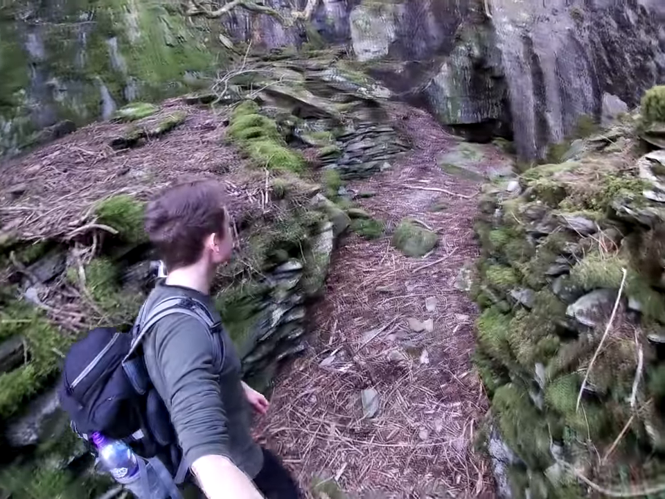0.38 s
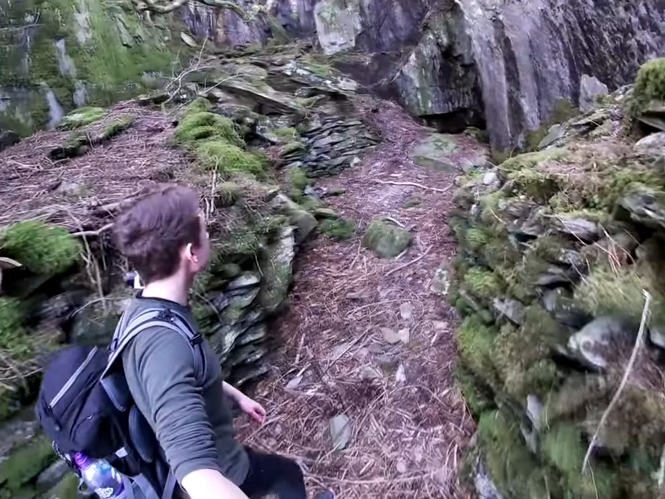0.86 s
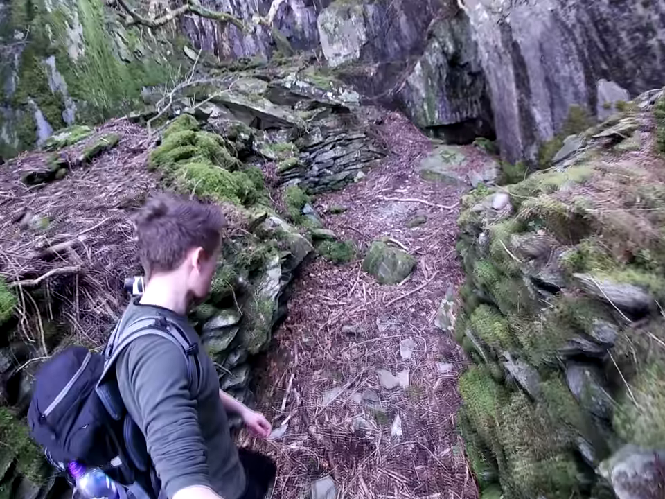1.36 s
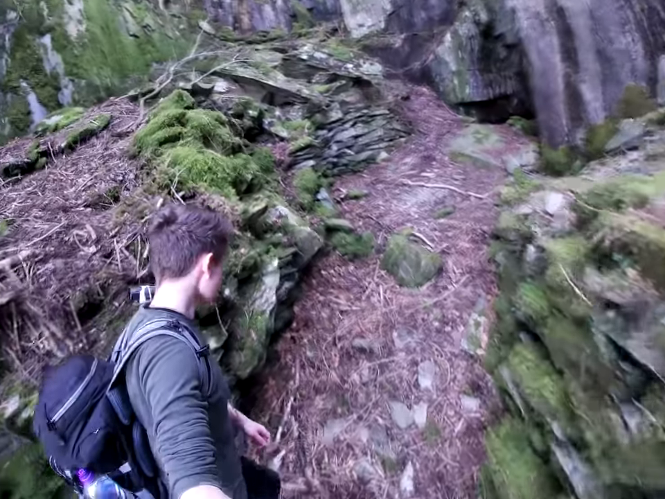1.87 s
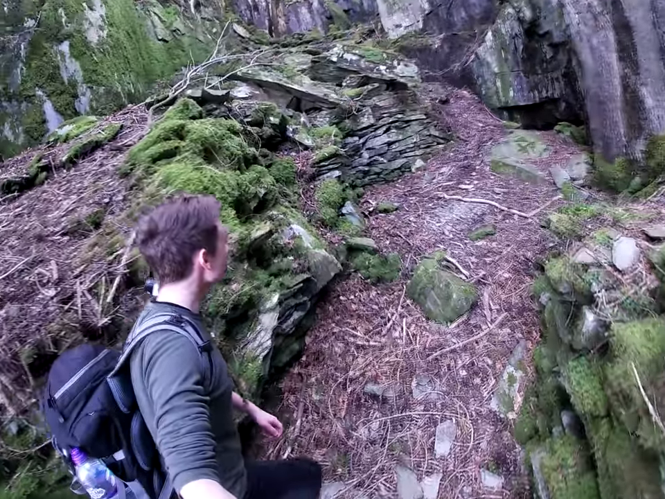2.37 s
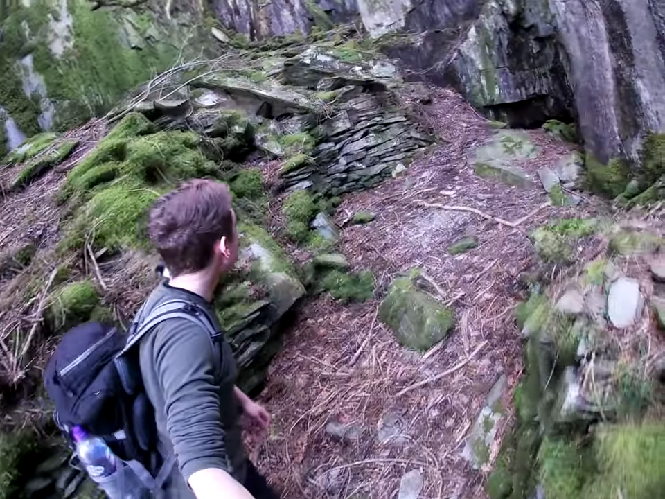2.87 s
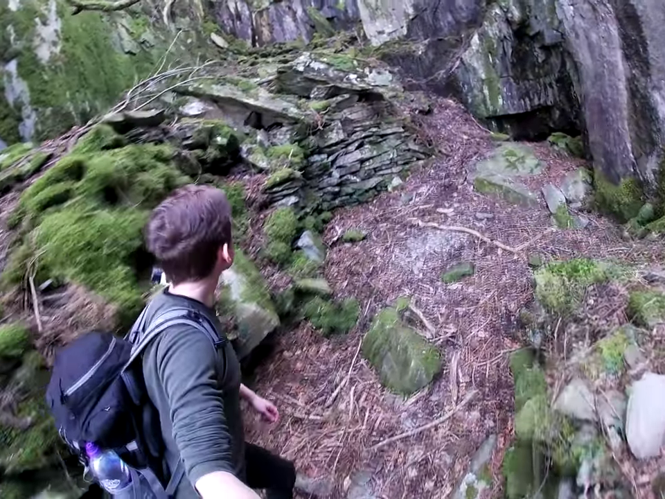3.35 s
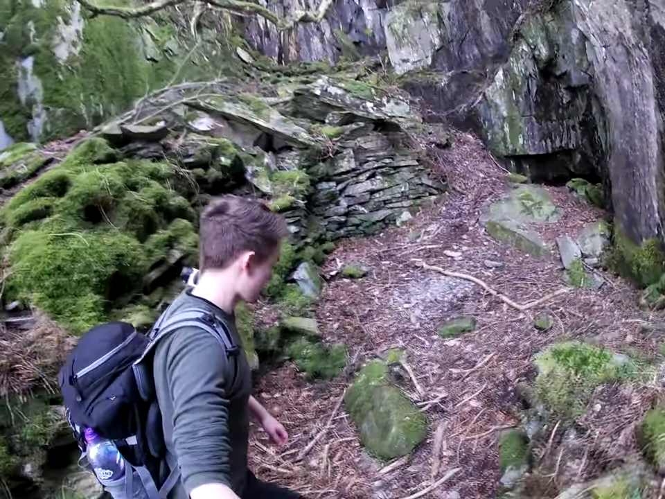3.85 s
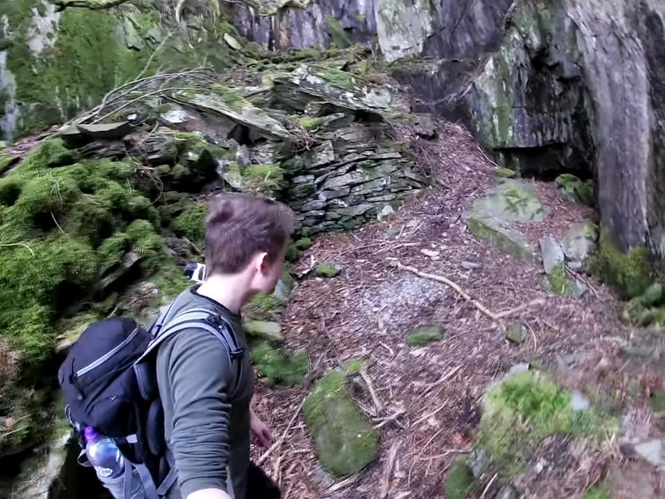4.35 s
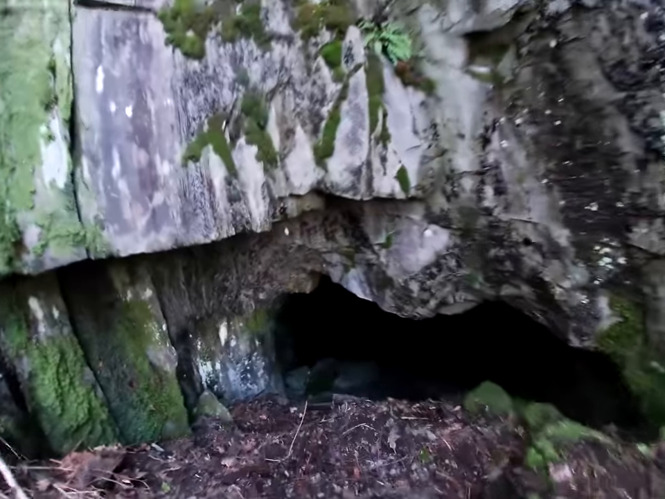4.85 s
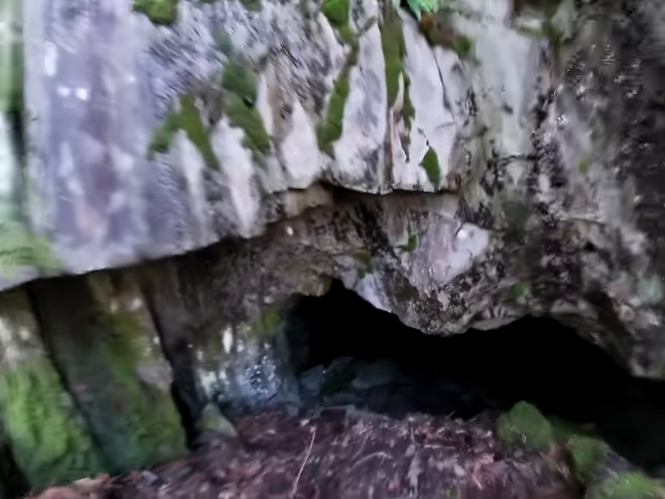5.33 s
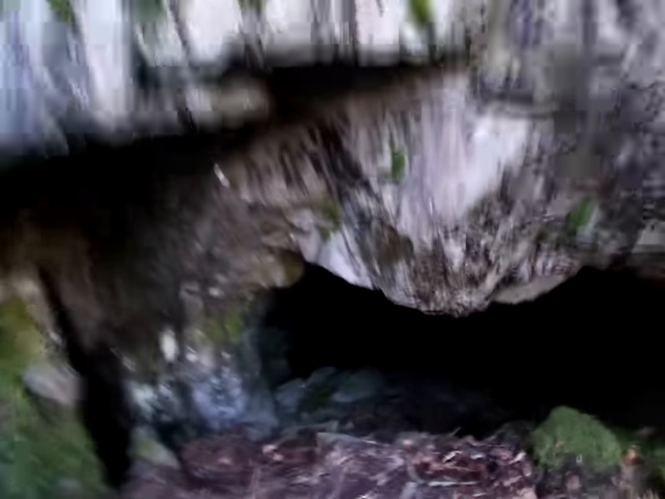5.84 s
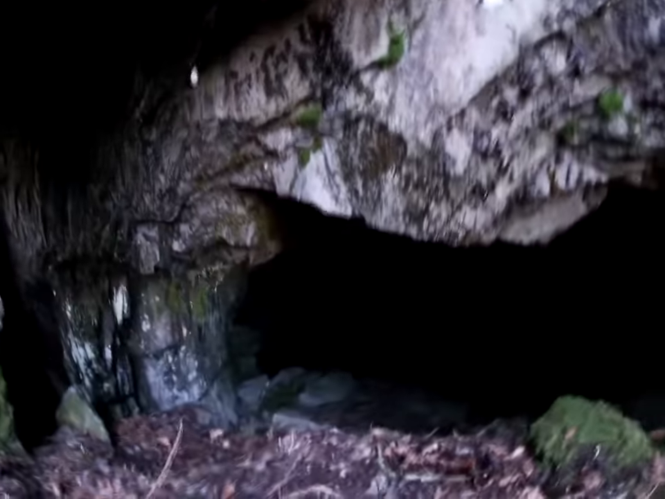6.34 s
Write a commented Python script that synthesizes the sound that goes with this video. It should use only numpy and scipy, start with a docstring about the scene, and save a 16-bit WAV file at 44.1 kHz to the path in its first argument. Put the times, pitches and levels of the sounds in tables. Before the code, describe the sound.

Close, crackly footsteps on woodland litter, sharp twig cracks, small stone clacks, a short scraping slab and low air rumble outdoors.

```python
"""Boots on litter and slate

Boots walk over dry needles, twigs and loose slate between rock walls, heard by one small microphone on a pole.
Litter is clouds of tiny damped breaks over dense noise; twigs are cracks with knocks and splinters; a dragged slate
is noise through resonances. A sole squeals by stick and slip, slate chips and a pack tap as decaying modes,
heel falls swing the pole as low damped sines, and light air rumbles as shaped noise."""
import sys
import numpy as np
from scipy import signal
from scipy.fft import rfft, irfft, next_fast_len
from scipy.io import wavfile
from scipy.ndimage import uniform_filter1d, map_coordinates

SR = 44100
rng = np.random.default_rng(int(sys.argv[2]) if len(sys.argv) > 2 else 0)


def wav_record(signal):
    """Record a signal, one row per channel, as 16-bit PCM in the file named by sys.argv[1]."""
    frames = np.transpose(np.atleast_2d(signal))
    bounded = np.clip(frames, -1, 1)
    # unit amplitude maps onto the largest positive 16-bit level
    quanta = np.round(bounded * 32767).astype(np.int16)
    wavfile.write(sys.argv[1], SR, quanta)


def field_ratio(decibels):
    """Amplitude ratio for a level in dB (20 dB per decade); scalars and array-likes work."""
    return 10 ** (np.asarray(decibels, dtype=float) / 20)


N = 295856
T = np.arange(N) / SR


def unit(x):
    """Normalisation: the signal scaled to rms 1."""
    return x / np.sqrt(np.mean(x ** 2) + 1e-20)


def along(points, hz):
    """Interpolation of (f/Hz, value) points on a logarithmic frequency axis."""
    f, v = np.transpose(points)
    return np.interp(np.log(hz + 1), np.log(f + 1), v)


def curves(rows, outside=None):
    """Linear interpolation in time: one value per sample for each column after t/s."""
    s, *cols = np.transpose(rows)
    return [np.interp(T, s, c, outside, outside) for c in cols]


def wobble(rate):
    """Slow random modulation: a smooth curve through rate random knots a second."""
    knots = rng.standard_normal(int(N * rate / SR) + 4)
    return map_coordinates(knots, [T * rate])


def filtered(x, response):
    """Linear filtering: the spectrum times a complex response of frequency."""
    m = next_fast_len(N + SR // 2)
    return irfft(rfft(x, m) * response(np.fft.rfftfreq(m, 1 / SR)), m)[..., :N]


def coloured(x, spectrum):
    """Spectral shaping by (f/Hz, gain/dB) points, then scaling to rms 1."""
    return unit(filtered(x, lambda hz: field_ratio(along(spectrum, hz))))


def air():
    """Turbulence: moving air is a lumpy low rumble of shaped noise, over a steady broadband hush."""
    # air over the microphone: t/s, rumble level/dB
    gusts = [(0, -63), (.35, -58), (1.5, -73.5), (1.9, -58.5), (3.4, -67), (4.2, -66), (5.3, -70),
             (5.75, -56), (6.25, -52), (6.6, -60)]
    # colour of the rumble: f/Hz, relative gain/dB
    rumble_colour = [(18, 2.5), (40, 4), (70, -12.5), (130, -56.5)]
    # colour of the steady hush, its top closed at 13 kHz: f/Hz, relative gain/dB
    hush_colour = [(53, -39.5), (90, -4.5), (175, 5), (354, -11.5), (778, -5), (2490, -9.5), (6070, -10),
                   (8630, -15), (12800, -40), (13800, -90)]
    hush_db = -64.5
    lumps = field_ratio(curves(gusts)[0] + 1.7 * wobble(25.0))
    rumble = lumps * coloured(rng.standard_normal(N), rumble_colour)
    return rumble + field_ratio(hush_db) * coloured(rng.standard_normal(N), hush_colour)


def rocks(x):
    """Reverberation: diffuse reflections from rock walls, each frequency decaying at its own rate."""
    # decay of the rock walls' answer: f/Hz, t60/s
    wall_decay = [(300, 0.17), (6000, 0.12)]
    hz, t, z = signal.stft(rng.standard_normal(SR // 3), SR, nperseg=256)
    decay = field_ratio(-60 * t / along(wall_decay, hz)[:, None])
    tail = signal.istft(z * decay, SR, nperseg=256)[1]
    delayed = np.pad(x, (150, 0))  # samples
    return signal.fftconvolve(delayed, tail / np.linalg.norm(tail))[:N]


def thuds():
    """Damped oscillation: the pole swings on after each heel fall, over a dull rattle of settling ground."""
    # heel falls felt through the pole: t/s, level/dB before the soft onset, f/Hz, t60/s
    heel_falls = [(1.125, -36, 206, 0.06), (2.152, -36, 212, 0.033), (2.392, -35.5, 74, 0.12),
                  (3.329, -41.5, 62, 0.4), (3.5, -37.5, 64.4, 0.24), (3.47, -33.5, 198, 0.15),
                  (4.087, -26.5, 51.3, 0.2), (4.763, -28.5, 198, 0.048), (5.33, -34, 320, 0.072),
                  (5.63, -41.5, 84.4, 0.17), (5.842, -32, 84.5, 0.1), (5.92, -17, 282, 0.017),
                  (5.966, -29.5, 72.6, 0.14), (6.564, -44, 70.4, 0.12)]
    out, t = np.zeros(N + SR), np.arange(SR // 2) / SR
    for s, db, hz, t60 in heel_falls:
        dull = np.convolve(rng.standard_normal(len(t)), np.hanning(SR // 500), "same")
        ground = dull * field_ratio(-31.5 - 60 * t / 0.18)
        swing = -np.sin(2 * np.pi * hz * t) * field_ratio(-60 * t / t60)
        onset = 1 - np.exp(-t * hz / 0.55)  # slower swings start softer
        out[round(s * SR):][:len(t)] += field_ratio(db) * (swing + ground) * onset
    return out[:N]


def slate():
    """Forced resonance: grit under the sliding slab kicks its modes; the hollow below sings as a fuzzy rising tone."""
    # a slate dragged over stones: t/s, level/dB
    scrape = [(5.39, -53), (5.41, -38.5), (5.53, -50.5), (5.7, -46), (5.74, -71)]
    # resonances of the slab: f/Hz, width/Hz, gain/dB
    modes = [(364, 39, 0), (687, 46, 3.5), (1140, 20, -4), (1350, 67, -4.5), (2176, 57, -7), (3460, 88, -3)]
    # the hollow under the slate sings: t/s, level/dB
    hollow = [(5.22, -67), (5.31, -51.5), (5.37, -75.5), (5.46, -57), (5.6, -54.5), (5.85, -66.5)]
    hollow_hz, closes_hz_per_s = 279, 190  # it rings higher as it closes

    def body(f):
        """Modal sum: resonances of alternating sign on a small direct part, with a gentle treble loss."""
        total = 0.096
        for k, (centre, width, db) in enumerate(modes):
            total = total + (-1) ** k * field_ratio(db) * 1j * f * width / (centre ** 2 - f ** 2 + 1j * f * width)
        return total / (1 + (f / 2500) ** 2)

    grit = rng.standard_normal(N) * field_ratio(2.5 * wobble(45) + 3 * wobble(200))
    phase = 2 * np.pi * np.cumsum(hollow_hz + closes_hz_per_s * (T - hollow[0][0])) / SR
    hum = np.sin(phase) * wobble(110) + np.cos(phase) * wobble(110)  # random sidebands blur the tone
    dragged = field_ratio(curves(scrape, -120)[0]) * unit(filtered(grit, body))
    return dragged + field_ratio(curves(hollow, -120)[0]) * hum


def ring(s, db, hz, t60):
    """Modal decay: a sum of sines, each with a short attack and an exponential decay."""
    since = np.maximum(T - s, 0)
    attack = 1 - np.exp(-since / 0.00079)  # s
    return np.sum(field_ratio(db - 60 * since / t60) * np.sin(2 * np.pi * hz * T) * attack, 0)


def taps():
    """Impact modes: one thin long mode on the pack; stones ring shorter and unevenly, the larger with an upper mode."""
    # something small on the pack taps: t/s, level/dB before the attack
    tinks = [(3.757, -51.5), (3.785, -50), (3.834, -54)]
    # slate chips knock together: t/s, level/dB before attack and chatter, f/Hz
    clacks = [(.840, -45, 761), (.850, -44, 764), (.862, -37.5, 753), (1.674, -35, 5970), (1.809, -37, 730),
              (2.64, -33.5, 717), (2.655, -28, 910), (2.717, -33, 5700), (2.724, -30, 8330),
              (4.045, -34, 850), (4.145, -41, 1002), (5.911, -40, 498), (6.544, -39, 1198),
              (6.561, -39.5, 1200)]
    tink_hz, tink_t60_s, clack_t60_s = 1900, 0.05, 0.035
    overtone_ratio, overtone_db, chatter_db = 3.1, -10, 2.5
    s, db, hz = np.transpose(clacks)[..., None]
    upper_db = db + overtone_db - 120 * (hz > 2000)  # small, high chips have no audible upper mode
    chips = ring(s, db, hz, clack_t60_s) + ring(s, upper_db, hz * overtone_ratio, clack_t60_s / 2)
    pack = ring(*np.transpose(tinks)[..., None], tink_hz, tink_t60_s)
    uneven = field_ratio(chatter_db * wobble(300)) * (1 + 0.4 * wobble(1600))  # uneven contact
    return pack + chips * uneven


def squeal():
    """Stick and slip: a shaky rate that speeds up gives a rough gliding tone with a weak overtone."""
    # a sole slips on stone: t/s, level/dB before the envelope
    slips = [(3.4593, -19), (3.47, -15.5), (3.496, -27)]
    attack_s, t60_s = 0.00075, 0.046
    from_hz, to_hz, glide_s = 880, 1205, 0.00604
    hz = to_hz - (to_hz - from_hz) * np.exp(-np.maximum(T - slips[0][0], 0) / glide_s)
    size = 0
    for s, db in slips:
        since = np.maximum(T - s, 0)
        size = size + field_ratio(db - 60 * since / t60_s) * (1 - np.exp(-since / attack_s))
    phase = 2 * np.pi * np.cumsum(hz * (1 + 0.0643 * wobble(250))) / SR
    return size * field_ratio(2.5 * wobble(120)) * (np.sin(phase) + 0.15 * np.sin(2 * phase))


def twigs():
    """Brittle fracture: a sharp crack, a short woody knock, and splinters that rattle on in the wood's pitch range."""
    # breaking twigs: t/s, level/dB of the whole break, knock f/Hz, knock level/dB before a common 16.5 dB lift
    breaks = [(0.0385, -37, 766, -3.5), (0.2137, -38.5, 540, 0.5), (0.3012, -29.5, 1050, -8),
              (0.7354, -44.5, 725, -4), (0.805, -34, 1500, -14.5), (0.9315, -31.5, 1710, -13),
              (0.946, -34.5, 1110, -7.5), (1.0254, -37, 1560, -29), (1.052, -32.5, 1600, -15.5),
              (1.1083, -28.5, 1010, -6), (1.1118, -25.5, 1420, -12), (1.1245, -35, 576, 2.5),
              (1.3663, -40, 850, -11), (1.595, -52, 1530, -6), (1.831, -34.5, 530, -5),
              (1.8633, -44.5, 1200, 3.5), (1.887, -37, 1460, -8), (1.924, -35.5, 1500, -12.5),
              (2.013, -37, 1610, -22), (2.0765, -25.5, 5830, -22), (2.3907, -14.5, 960, -7),
              (2.5695, -41.5, 990, 2.5), (2.627, -40, 3800, -18), (2.662, -30, 6200, -21),
              (2.7143, -32.5, 1900, -17.5), (3.1434, -28.5, 1600, -53), (3.214, -16.5, 1245, -5),
              (3.257, -23.5, 1310, -14), (3.3, -41, 1500, -14), (3.3417, -38.5, 800, -3),
              (3.505, -22.5, 880, -6.5), (3.519, -25, 1200, -9.5), (3.7456, -38.5, 1900, -40),
              (3.9835, -41, 820, -0.5), (4.089, -39.5, 1200, -5.5), (4.199, -33.5, 6400, -21),
              (4.2313, -40.5, 1150, -3), (4.3997, -32.5, 920, -14.5), (4.582, -18, 610, -13.5),
              (4.7146, -47.5, 1270, -6), (4.7606, -54.5, 870, 12.5), (4.8734, -38, 1370, -17.5),
              (4.9387, -25, 1530, -27.5), (4.9704, -25, 1440, -24), (5.014, -36.5, 1350, -13),
              (5.0353, -33.5, 1154, -16), (5.9377, -38, 526, 8), (6.633, -46, 3580, -20),
              (6.6369, -40, 2580, -22)]
    # colour of the snapping twigs, bright from 3 to 8.5 kHz: f/Hz, gain/dB
    snap_colour = [(300, -12), (1500, 0), (3000, 8), (8500, 5), (10500, -12), (16000, -40), (16600, -80)]
    out, t = np.zeros(N + SR), np.arange(SR // 10) / SR
    for s, db, knock_hz, knock_db in breaks:
        noise = rng.standard_normal((3, len(t)))
        u = t / .00006
        pressure_step = 0.85 * (1 - u) * np.exp(-u)
        tearing_fibres = noise[0] * field_ratio(-1.5 - 60 * t / 0.0065)
        splinters = noise[1] * field_ratio(-13.0 - 60 * t / 0.035) * (1 - np.exp(-t / 0.0028))
        knock = np.sin(2 * np.pi * knock_hz * t) * field_ratio(knock_db + 16.5 - 60 * t / 0.0075)
        rattle = np.convolve(noise[2] * field_ratio(-27.5 - 60 * t / 0.029), knock[:64])[:len(t)]
        snap = pressure_step + tearing_fibres + splinters + knock + rattle
        out[round((s + .0009) * SR):][:len(t)] += field_ratio(db) * snap
    return filtered(out[:N], lambda hz: field_ratio(along(snap_colour, hz)))


def weight():
    """Energy addition: crackle and crunch levels/dB, as steps land, settle and lift and scuffs swell and fade."""
    # a sole bears on the litter: start t/s, hold/s, crackle level/dB, crunch over crackle/dB
    footfalls = [(0, 0.36, -49.5, -7.5), (0.737, 0.19, -57, 2), (1.25, 0.11, -53, -10.5),
                 (1.66, 0.38, -54, -3), (2.026, 0.45, -61, -6.5), (2.404, 0.44, -53.5, -5.5),
                 (3.257, 0.3, -46.5, -1), (3.748, 0.13, -60.5, -16), (3.999, 0.34, -51.5, -6.5),
                 (4.397, 0.25, -58, -5), (4.95, 0.15, -53.5, -7.5), (5.21, 0.12, -52.5, -2),
                 (5.394, 0.66, -59, 4), (5.93, 0.17, -51.5, -5)]
    # the sole twists or pushes off: peak t/s, time to fade 10 dB/s (0 is silent), crackle level/dB, crunch over crackle/dB
    twists = [(0.933, 0.0872, -47.5, -6.5), (1.129, 0.09, -51.5, -5), (1.671, 0, -44.5, -27),
              (2.109, 0.025, -41, -6.5), (2.628, 0.0128, -51, 6.5), (2.663, 0.0211, -39, 3),
              (2.725, 0.15, -51.5, -24), (3.333, 0.0759, -43.5, 5), (3.446, 0.027, -32.5, -10),
              (3.476, 0.02, -33.5, 4), (3.571, 0.03, -34, -25), (4.071, 0.0249, -33, -0.5),
              (5.641, 0.0363, -57, 14.5), (5.692, 0.0416, -41, -2.5), (5.838, 0.03, -49, 5),
              (5.944, 0.031, -37.5, 3)]
    lands_db_per_s, settles_db_per_s, lifts_db_per_s = 1396, 5.5, 135
    rise_over_fade = 0.67
    t = T[None, ::64]
    s, hold, db, low_db = np.transpose(footfalls)[..., None]
    landing = lands_db_per_s * np.maximum(s - t, 0)
    settling = settles_db_per_s * np.clip(t - s, 0, hold)
    lifting = lifts_db_per_s * np.maximum(t - s - hold, 0)
    steps = db - landing - settling - lifting
    s, fade, db, dull_db = np.transpose(twists)[..., None]
    scuffs = db - 10 * np.maximum((s - t) / rise_over_fade, t - s) / fade

    def total(a, b):
        """Power sum of two sets of levels/dB."""
        power = np.sum(field_ratio(2 * a), 0) + np.sum(field_ratio(2 * b), 0)
        return np.interp(T, t[0], 10 * np.log10(power + 1e-12))

    return total(steps, scuffs), total(steps + low_db, scuffs + dull_db)


def patchy(depth_db):
    """Spectral modulation: noise coloured anew from leaf to leaf by random gain in small time-frequency patches."""
    z = signal.stft(rng.standard_normal(N), nperseg=256)[2]
    field = uniform_filter1d(rng.standard_normal(z.shape), size=8, axis=0)
    field = uniform_filter1d(field, size=8, axis=1)
    return unit(signal.istft(z * field_ratio(depth_db * unit(field)), nperseg=256)[1][:N])


def grains(count, hz, spread, cycles, sizes_db):
    """Shot noise: tiny breaks at random moments, damped sines of scattered pitch, few of them big."""
    when, pitch, size = rng.random((count, 3)).T
    f = hz * np.exp(spread * (2 * pitch - 1))[:, None]
    n = np.arange(192)
    height = field_ratio(-sizes_db * np.log(size + .007))[:, None]  # the offset limits the largest grains
    wave = height * np.sin(2 * np.pi * f * n / SR) * np.exp(-f * n / SR / cycles)
    at = (when * N).astype(int)[:, None] + n
    return unit(np.bincount(at.ravel(), wave.ravel(), N + len(n))[:N])


def litter():
    """Crackling noise: needles crackle high and leaves crunch low, in clumps, over a rustle of merged grains."""
    # colour of the needles: f/Hz, relative gain/dB
    crackle_colour = [(1000, -7.5), (1700, -10.5), (2780, -4.5), (6150, -2), (8580, -5), (11400, -24.5),
                      (15500, -33)]
    # colour of the leaves: f/Hz, relative gain/dB
    crunch_colour = [(71, -42), (120, -13), (183, -3), (340, -22), (673, -10.5), (1440, -5.5), (2600, -12),
                     (3380, -59.5)]
    crackle_db, crunch_db = weight()
    clump = 1.3 * wobble(35)  # dB, shared by both layers
    dense = field_ratio(0.1 * (crackle_db + 77.5))  # more weight breaks more at once: the grains merge
    fine = grains(count=5000, hz=4315, spread=0.99, cycles=2.5, sizes_db=2.5)
    fine = fine + 1.59 * dense * patchy(depth_db=3)
    # brittle stems click across the whole range
    fine = fine + 1.02 * grains(count=400, hz=4500, spread=0.5, cycles=0.6, sizes_db=4.5)
    coarse = grains(count=2500, hz=823, spread=0.79, cycles=1.97, sizes_db=2.5)
    coarse = coarse + 0.74 * dense * rng.standard_normal(N)
    even = np.sqrt(1 + dense ** 2)  # offsets the power that the rustle adds
    fine = coloured(fine / even * field_ratio(clump + 1.82 * wobble(90)), crackle_colour)
    coarse = coloured(coarse / even * field_ratio(clump + 1.5 * wobble(40)), crunch_colour)
    return field_ratio(crackle_db) * fine + field_ratio(crunch_db) * coarse


def scene():
    """Superposition: all sources add at one microphone, which feeds both channels."""
    hard = twigs() + slate() + taps()
    echo = field_ratio(-10) * rocks(hard)
    return np.tile(hard + echo + squeal() + litter() + thuds() + air(), (2, 1))


def roll_off(x):
    """The treble ends steeply here."""
    return signal.sosfilt(signal.butter(12, 15800, fs=SR, output="sos"), x)


def record(dry):
    """Mid and side: a treble part of randomly flipping polarity enters the two channels with opposite signs."""
    # how far the channels differ, before the flips: f/Hz, gain/dB
    side_gain = [(2500, -44.5), (10500, -30.5), (12000, -1.5)]
    flicker = np.sign(wobble(300))
    treble = filtered(dry[0], lambda hz: field_ratio(along(side_gain, hz)))
    side = filtered(treble * flicker, lambda hz: hz < 13500)
    mix = dry + side * [[1], [-1]]
    return roll_off(mix)


dry = scene()
out = record(dry)
wav_record(out)
```